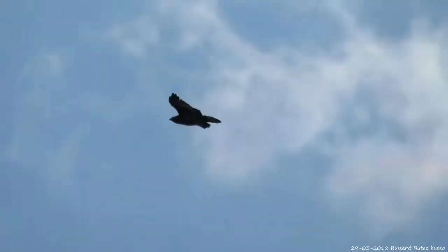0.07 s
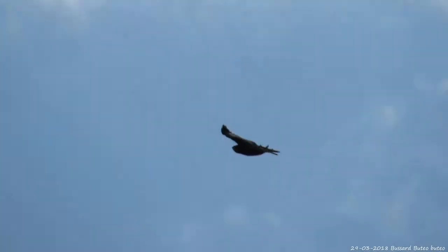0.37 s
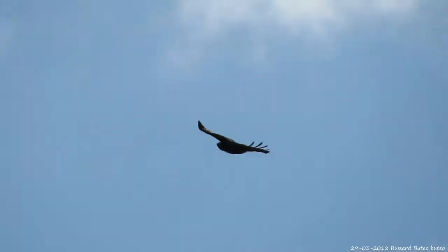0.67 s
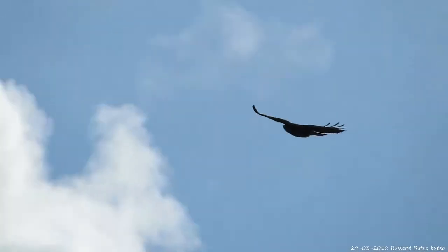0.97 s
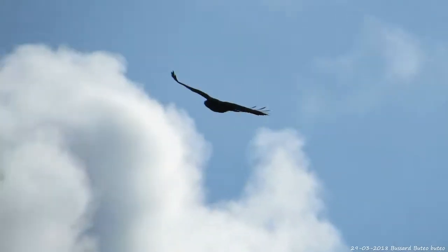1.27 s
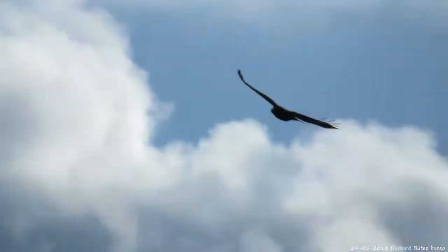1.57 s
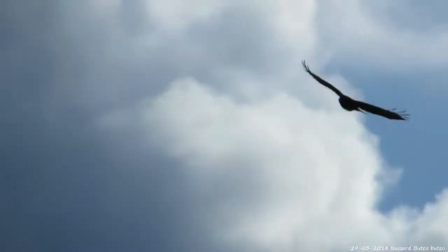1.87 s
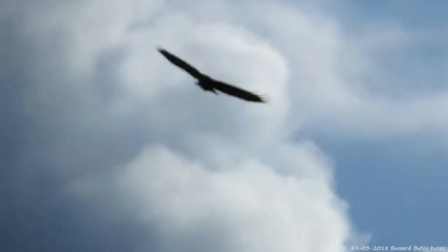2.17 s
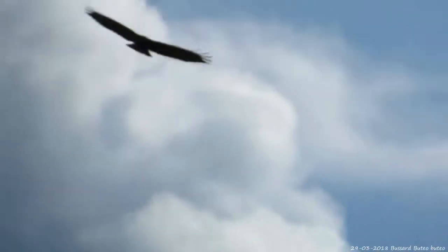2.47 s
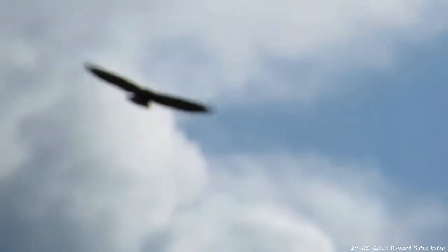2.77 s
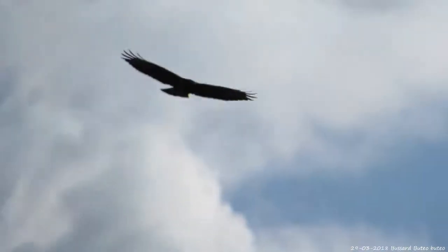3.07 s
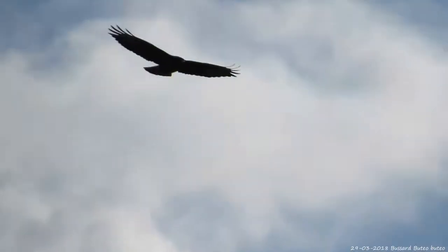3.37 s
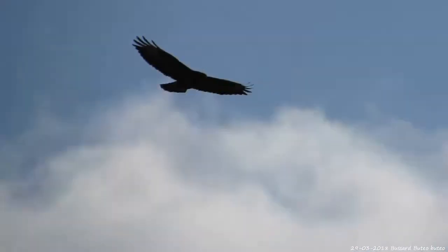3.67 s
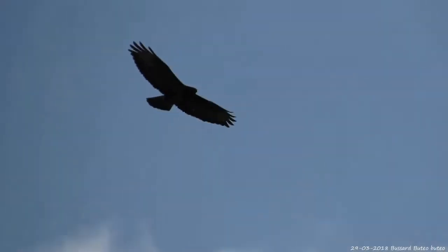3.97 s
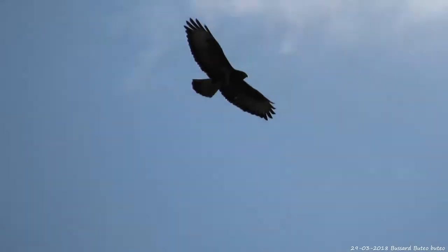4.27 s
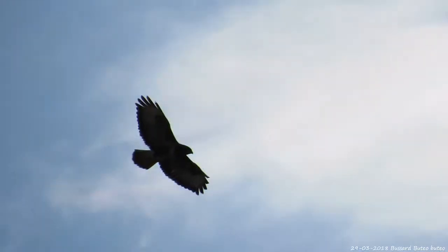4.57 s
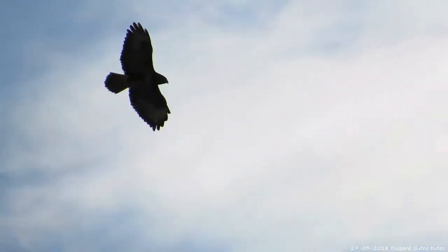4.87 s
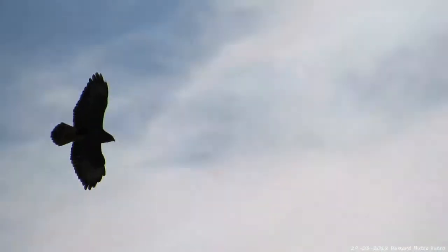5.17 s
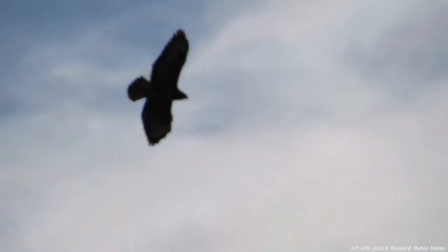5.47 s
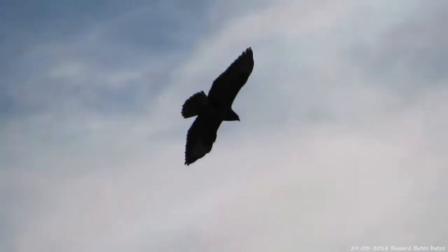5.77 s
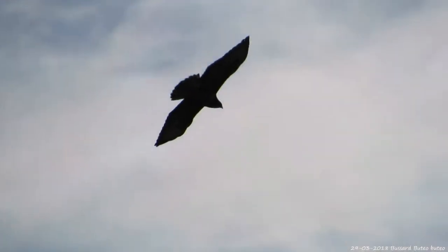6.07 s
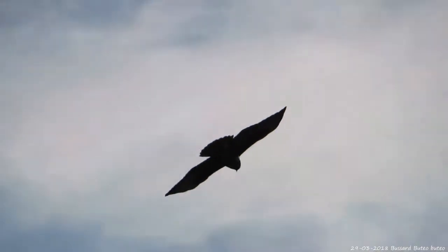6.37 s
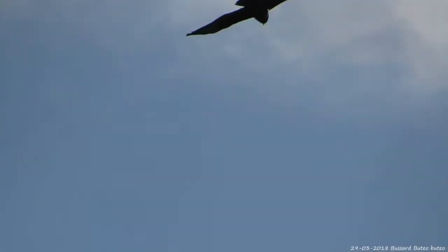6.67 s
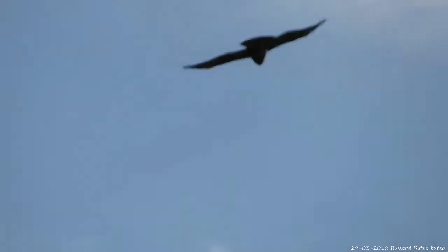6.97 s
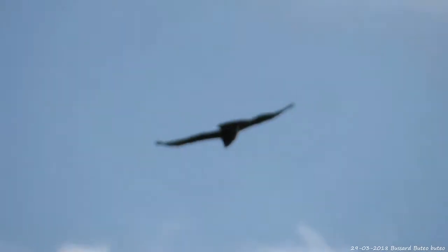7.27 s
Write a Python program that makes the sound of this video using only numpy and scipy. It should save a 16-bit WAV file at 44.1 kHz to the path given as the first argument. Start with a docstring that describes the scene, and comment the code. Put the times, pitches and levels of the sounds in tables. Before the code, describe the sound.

In open country, light wind rumbles on the microphone over a soft hiss, distant traffic and a far engine drone. Small birds whistle faintly in faraway trees. A buzzard mews overhead, a clear high cry that falls and ends hoarse. About three seconds later it mews again, louder and quavering. The hiss rises and stays, and the small birds carry on.

```python
"""Open country, one microphone: light wind rumbles over its hiss, traffic and an engine drone far off,
and small birds whistle in distant trees. A dry tick sounds close by, then the deepest drone dies away.
At 2.7 s a buzzard mews overhead, its syrinx ringing through throat and open beak: a creaky start, a clear
high cry, a long fall that ends hoarse. After another tick it mews again at 5.6 s, louder and quavering.
The hiss comes up and stays; the far engine swells and the small birds carry on to the end."""
import sys
import numpy as np
from scipy import signal
from scipy.fft import rfft, irfft, next_fast_len
from scipy.io import wavfile
from scipy.ndimage import uniform_filter1d

SR = 44100
rng = np.random.default_rng(int(sys.argv[2]) if len(sys.argv) > 2 else 0)


def dump(signal):
    """Clip the signal to [-1, 1] and save it as 16-bit WAV at the path in sys.argv[1]."""
    limited = np.clip(np.atleast_2d(signal).T, -1, 1)
    pcm = np.round(limited * 32767).astype(np.int16)
    wavfile.write(sys.argv[1], SR, pcm)


N = 326781
TIME = np.arange(N) / SR


def from_db(db):
    """Decibels to gain."""
    return 10 ** (np.asarray(db) / 20)


def unit_power(x):
    """Scale to an RMS of 1."""
    return x / np.sqrt(np.mean(x ** 2) + 1e-20)


def curve(points, t=TIME):
    """Join (time, value) points by straight lines."""
    return np.interp(t, *np.transpose(points))


def gain_at(spectrum, hz):
    """Gain of a spectrum, read on a log-frequency axis."""
    points, db = np.transpose(spectrum)
    return from_db(np.interp(np.log(hz + 1e-9), np.log(points), db))


def colour(x, spectrum):
    """Pass a sound through a spectrum; unit power."""
    size = next_fast_len(len(x))
    hz = np.arange(size // 2 + 1) * SR / size
    return unit_power(irfft(rfft(x, size) * gain_at(spectrum, hz), size)[:len(x)])


def drift(rate, size=N):
    """Random wander through `rate` points a second; unit power."""
    position = np.arange(size) / SR * rate
    return unit_power(np.interp(position, np.arange(8192), rng.standard_normal(8192)))


def hump(t, s, half_width):
    """A smooth rise and fall of height 1, centred on s."""
    return np.exp(-((t - s) / half_width) ** 2)


def swelling(swells, base_db):
    """Gain of a steady sound that swells now and then."""
    return from_db(base_db + sum(db * hump(TIME, s, half_width) for s, half_width, db in swells))


def resonate(x, hz, width_hz):
    """One resonance; a unit click rings with height about 1."""
    r = np.exp(-np.pi * width_hz / SR)
    return signal.lfilter([.5, 0, -.5], [1, -2 * r * np.cos(2 * np.pi * hz / SR), r * r], x + 1e-18)


def scatter(x, t60, build_s):
    """Diffuse echo from ground and trees."""
    t = np.arange(2 * SR) / SR
    tail = rng.standard_normal(len(t)) * from_db(-60 * t / t60) * (1 - np.exp(-(t / build_s) ** 2))
    return signal.fftconvolve(x, tail / np.sqrt(np.sum(tail ** 2)))[:N]


# wind at the microphone, spectrum: (f/Hz, relative level/dB)
WIND_SPECTRUM = [(15, -1), (28, 1.5), (60, 1.5), (100, -20), (170, -11), (300, -42)]
# its gusts: (t/s, half width/s, rise/dB)
GUSTS = [(.65, 0.42, 9), (3.902, 0.58, 8), (5.997, 0.34, 7)]

def wind():
    """Light wind rumbles on the microphone."""
    return swelling(GUSTS, base_db=-66) * colour(rng.standard_normal(N), WIND_SPECTRUM)


# far traffic, spectrum: (f/Hz, relative level/dB)
TRAFFIC_SPECTRUM = [(190, -12), (260, -5.5), (330, 1), (420, -1.5), (560, -5.5), (750, -16), (1000, -3),
                    (1300, -16), (2500, -39.5)]
# its swells: (t/s, half width/s, rise/dB)
TRAFFIC_SWELLS = [(3.557, 0.61, 5), (6.542, 0.94, 3)]

def traffic():
    """Traffic a long way off arrives as a dull roar."""
    return swelling(TRAFFIC_SWELLS, base_db=-57) * colour(rng.standard_normal(N), TRAFFIC_SPECTRUM)


# the countryside all round, spectrum: (f/Hz, relative level/dB)
MURMUR_SPECTRUM = [(100, -1.5), (200, -12), (300, -8.5), (400, -2.5), (560, 2.5), (750, -2), (1050, -3.5),
                   (1400, -5), (2000, -12), (3000, -20.5), (6000, -27)]
# its rise and fall: (t/s, level/dB)
MURMUR_LEVEL = [(0, -55), (2.6, -54), (4.0, -54), (5.5, -56.5), (5.75, -51), (6.1, -50.5), (6.7, -52.5),
                (7.41, -52)]

def countryside():
    """The soft murmur of open land."""
    return from_db(curve(MURMUR_LEVEL)) * colour(rng.standard_normal(N), MURMUR_SPECTRUM)


# the microphone's own noise, spectrum: (f/Hz, relative level/dB)
HISS_SPECTRUM = [(500, -8), (3000, 4), (5000, 2), (8000, 0), (12000, -3), (16000, -8.5)]

def microphone_hiss(base_db=-62.5, step_db=4, step_at_s=5.55, rise_s=.13):
    """The hiss comes up during the second mew and stays."""
    step = np.clip((TIME - step_at_s) / rise_s, 0, 1)
    return from_db(base_db + step_db * step) * colour(rng.standard_normal(N), HISS_SPECTRUM)


# the far engine's lines: (order of the firing rate, relative level/dB)
ENGINE_ORDERS = [(3, -72), (4, -76), (5, -71.5), (6, -89.5), (7, -75), (8, -68), (14, -75.5), (18, -82),
                 (22, -70.5)]
# moments when it carries better: (t/s, half width/s, rise/dB)
ENGINE_SWELLS = [(.9, 0.72, 4.5), (2.5, .7, 5), (4.6, 0.69, 3.5), (6.8, 0.76, 9.5)]

def far_engine(firing_hz=18.66):
    """The low orders of a distant engine waver on the wind."""
    phase = 2 * np.pi * np.cumsum(firing_hz * (1 + .00212 * drift(1.665))) / SR
    lines = sum(from_db(db + 1.7 * drift(2.93)) * np.sin(round(order) * phase + rng.uniform(0, 2 * np.pi))
                for order, db in ENGINE_ORDERS)
    return np.sqrt(2) * swelling(ENGINE_SWELLS, base_db=-3) * lines


def low_drone(hz=53.1, start_db=-56, fade_at_s=1.88, fade_db_per_s=19):
    """A deep tone under the engine holds, then dies away."""
    level_db = start_db - fade_db_per_s * np.maximum(TIME - fade_at_s, 0) + .3 * drift(5.1)
    phase = 2 * np.pi * np.cumsum(hz * (1 + .0077 * drift(2))) / SR
    return np.sqrt(2) * from_db(level_db) * np.sin(phase)


# whistles from the far trees: (t/s, length/s, f/Hz, level/dB)
WHISTLES = [(0.068, .07, 5680, -69), (0.236, 0.082, 5700, -80), (.677, .084, 5500, -66),
            (1.039, 0.15, 4176, -60), (1.483, .1, 4280, -63), (1.681, 0.097, 4410, -60),
            (2.127, 0.1, 4320, -60), (6.13, .08, 4860, -62), (6.407, 0.26, 3357, -62.5),
            (6.617, 0.23, 4700, -62), (6.705, 0.061, 4300, -59), (6.893, 0.23, 3400, -60),
            (7.148, 0.083, 4310, -58)]
# buzzes from the same trees: (t/s, f/Hz, level/dB)
BUZZES = [(.46, 3870, -69), (1.242, 5290, -68.5), (1.837, 5280, -65), (2.31, 5100, -64.5),
          (7.105, 4750, -60.5), (7.288, 4950, -64.5)]

def small_birds(scoop_hz=139, scoop_s=.0247, whistle_waver_hz=22.6, buzz_waver_hz=200, buzz_s=.11):
    """Thin notes drop on to their pitch, smeared by the trees; a wide, fast waver makes a buzz."""
    out = np.zeros(N)
    notes = [(s, length, hz, db, whistle_waver_hz) for s, length, hz, db in WHISTLES]
    notes += [(s, buzz_s, hz, db, buzz_waver_hz) for s, hz, db in BUZZES]
    for s, length, note_hz, db, waver_hz in notes:
        size, at = int(length * SR), int(s * SR)
        progress = np.linspace(0, 1, size)
        hz = note_hz + scoop_hz * np.exp(-progress * length / scoop_s) + waver_hz * drift(473, size)
        swell = np.sqrt(8 * progress * (1 - progress))
        note = from_db(db + 1.5 * drift(50, size)) * swell * np.sin(2 * np.pi * np.cumsum(hz) / SR)
        out[at:at + size] += note[:N - at]
    return out + from_db(-2.5) * scatter(out, t60=.7, build_s=.015)


# dry ticks close to the microphone: (t/s, relative level/dB)
TICKS = [(1.062, -36), (5.544, -34)]

def ticks(decay_s=.00089):
    """Each tick is a millisecond of crackle in one broad resonance."""
    bursts = sum(from_db(db) * (TIME >= s) * np.exp(-abs(TIME - s) / decay_s) for s, db in TICKS)
    return .25 * resonate(bursts * rng.standard_normal(N), hz=2760, width_hz=890)


# the creak that opens each mew: (start t/s, end t/s, starting level/dB, ending level/dB)
CREAKS = [(2.747, 2.768, -44, -33), (5.585, 5.611, -36, -21)]

def creaks(first_gap_s=.0039, last_gap_s=.0026, snap_s=.00033, snap_hz=2480):
    """Before the buzzard's tone catches, its membrane snaps in pulses that quicken and swell."""
    clicks = np.zeros(N)
    for start, end, first_db, last_db in CREAKS:
        s = start
        while s < end:
            progress = (s - start) / (end - start)
            clicks[int(s * SR)] = from_db(first_db + progress * (last_db - first_db))
            s += (first_gap_s + progress * (last_gap_s - first_gap_s)) * rng.uniform(.93, 1.07)
    # each snap is a few cycles that swell and die
    t = np.arange(SR // 200) / SR
    snap = (t / snap_s) ** 2 * np.exp(-t / snap_s) * np.sin(2 * np.pi * snap_hz * t)
    return signal.fftconvolve(clicks, snap / np.max(abs(snap)))[:N]


CLEAR_HZ = 1360   # below this pitch the voice roughens
# brief cracks in the voice: (t/s, half width/s, added period doubling, added rasp, overtone lift/dB)
CRACKS = [(2.893, .022, 0.11, .12, 5), (2.968, 0.026, 0.44, 0.2, -3), (3.065, .03, 0.34, 0.4, 8.5),
          (3.225, 0.023, 0, 0, 5), (5.765, 0.023, 0.03, .02, 1.5), (5.845, 0.028, 0.95, 0, -2),
          (5.993, .022, 1, .18, -5), (6.25, 0.018, 0.6, .4, -2)]

def syrinx_controls(t, pitch, loudness, glide_s=.02, sag_hz_per_s=560, dissolve_s=.047):
    """The voice is rough until it catches, roughens as it sinks and is hoarse once the tone gives out."""
    caught_s, spent_s = pitch[0][0], pitch[-1][0]
    hz = uniform_filter1d(curve(pitch, t), int(glide_s * SR))
    hz -= sag_hz_per_s * np.maximum(t - spent_s, 0)
    hoarse = np.clip((t - spent_s) / dissolve_s + .5, 0, 1)
    octaves_down = np.maximum(np.log2(CLEAR_HZ / hz), 0)
    onset = np.exp(-np.maximum(t - caught_s, 0) / .01)
    rasp = .032 + .27 * octaves_down + .26 * onset
    doubling = .017 + .3 * hoarse
    level_db = curve(loudness, t)
    # overtones ride through brief dips of the main tone
    lift_db = .45 * (uniform_filter1d(level_db, int(.13 * SR)) - level_db)
    for s, half_width, crack_doubling, crack_rasp, crack_db in CRACKS:
        crack = hump(t, s, half_width)
        doubling += crack_doubling * crack
        rasp += crack_rasp * crack
        lift_db += crack_db * crack
    rasp += (1 - rasp) * hoarse
    return hz, level_db, np.clip(doubling, 0, 1), np.clip(rasp, 0, 1), lift_db


# response of the buzzard's throat and open beak: (f/Hz, relative level/dB)
THROAT = [(550, -41), (1000, -8), (1380, -13.5), (1780, 2.5), (2130, 6.5), (2550, 6), (2900, -3),
          (3130, -16), (3900, -19), (4350, -23), (4900, -33.5), (5700, -33.5), (7000, -40.5), (8800, -54),
          (12000, -67)]

def mew(pitch, loudness, bright_db, flutter_db=1.65, breath=.44, fade_s=.011):
    """The syrinx tone slides under a steady throat resonance: its second, then third harmonic leads."""
    span = (TIME > loudness[0][0] - .005) & (TIME < loudness[-1][0] + .01)
    t = TIME[span]
    size = len(t)
    hz, level_db, doubling, rasp, lift_db = syrinx_controls(t, pitch, loudness)
    overtone_db = bright_db + lift_db
    # a slack membrane wobbles more
    wobble = .003 * drift(150, size) + .014 * rasp * drift(600, size)
    phase = 2 * np.pi * np.cumsum(hz * (1 + wobble)) / SR
    multiples = np.arange(2, 21)[:, None] / 2
    partial_hz = multiples * hz
    above_throat = np.clip((partial_hz - 3000) / 400, 0, 1)
    # alternating strong and weak cycles put lines halfway between the harmonics, most of all high up
    halfway = np.minimum(doubling * (1 + 3 * above_throat), 1)
    weights = gain_at(THROAT, partial_hz) * np.where(multiples % 1 == 0, 1, halfway)
    flicker_db = np.array([2.5 * drift(45, size) + 2.5 * drift(260, size) for _ in multiples])
    # a higher, more pressed voice is brighter
    press_db = 2 * np.log2(hz / CLEAR_HZ) + 4 * np.log2(partial_hz / 4500)
    weights *= from_db(above_throat * (overtone_db + press_db + flicker_db))
    tone = np.sum(weights * np.sin(multiples * phase), axis=0) / np.sqrt(np.sum(weights ** 2, axis=0) / 2)
    # turbulence puffs every other cycle and rings in the same throat; a little escapes as bright scratch
    puffs = rng.standard_normal(size) * (1 + np.cos(phase / 2)) * from_db(1.6 * drift(240, size))
    noise = unit_power(resonate(colour(puffs, THROAT), 1800, 1300))
    scratch = from_db(overtone_db - 32) * unit_power(resonate(resonate(puffs, 3900, 3000), 4200, 4500))
    voice = np.sqrt(1 - rasp ** 2) * tone + breath * rasp * noise + scratch
    fade = np.clip(np.minimum(t - t[0], t[-1] - t) / fade_s, 0, 1)
    out = np.zeros(N)
    out[span] = voice * fade * from_db(level_db + flutter_db * drift(114.3, size))
    return out


# pitch of the first mew overhead, sliding down: (t/s, f/Hz)
PITCH_SLIDING = [(2.765, 1135), (2.787, 1277), (2.801, 1273), (2.827, 1355), (2.847, 1341), (2.933, 1115),
                 (3.131, 840), (3.201, 799), (3.271, 696), (3.323, 684), (3.43, 582.9)]
# pitch of the second, quavering as it falls: (t/s, f/Hz)
PITCH_QUAVERING = [(5.605, 1175), (5.631, 1376), (5.659, 1418), (5.825, 1086), (5.889, 1055), (5.929, 893),
                   (5.957, 889), (5.993, 1004), (6.009, 968.2), (6.097, 735.5), (6.119, 812), (6.147, 806),
                   (6.177, 644.4), (6.205, 589), (6.231, 794), (6.271, 779), (6.315, 662)]
# loudness at the microphone, one curve a mew: (t/s, level/dB)
MEW_LEVELS = [
    [(2.764, -39.5), (2.774, -31.5), (2.808, -28), (2.832, -44), (2.85, -29.5), (3.07, -46), (3.092, -37.5),
     (3.122, -43), (3.158, -38), (3.214, -44.5), (3.25, -41), (3.368, -54), (3.554, -46.5), (3.61, -71)],
    [(5.604, -28.5), (5.626, -23), (5.658, -27.5), (5.72, -24), (5.784, -28.5), (5.794, -34.5),
     (5.888, -42.5), (5.938, -35), (5.992, -42), (6.042, -36), (6.082, -42), (6.242, -46), (6.278, -39.5),
     (6.43, -55)],
]

def buzzard():
    """Two mews from overhead; the trees send back mainly the strong middle of the cry."""
    first = mew(PITCH_SLIDING, MEW_LEVELS[0], bright_db=1.0)
    second = mew(PITCH_QUAVERING, MEW_LEVELS[1], bright_db=2.7)
    direct = first + second + creaks()
    middle = .28 * resonate(direct, hz=1660, width_hz=2200)
    return direct + from_db(-13) * scatter(middle, t60=.77, build_s=.013)


def scene():
    """One microphone in the open: the countryside all round, the buzzard above."""
    background = wind() + traffic() + countryside() + microphone_hiss() + far_engine() + low_drone()
    return (background + buzzard() + small_birds() + ticks())[None]


def record(dry, cutoff_hz=15700):
    """The top of the treble is cut steeply."""
    return signal.sosfilt(signal.ellip(12, .1, 70, cutoff_hz, fs=SR, output="sos"), dry)


dry = scene()
out = record(dry)
dump(out)
```